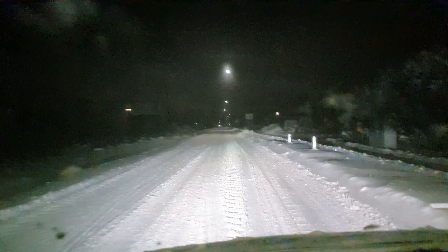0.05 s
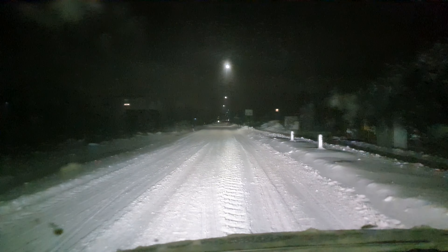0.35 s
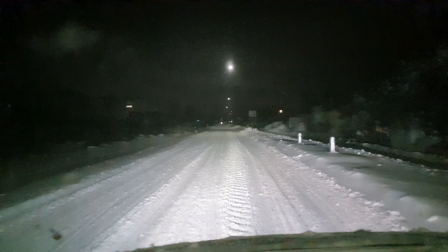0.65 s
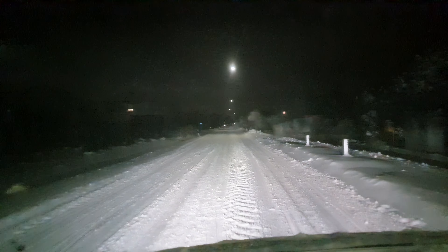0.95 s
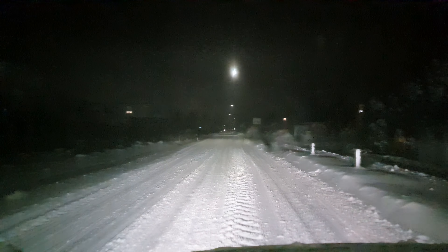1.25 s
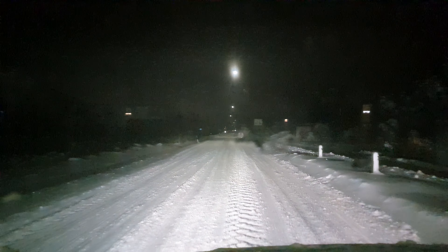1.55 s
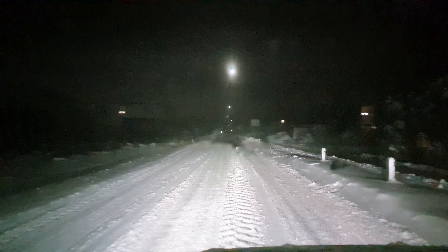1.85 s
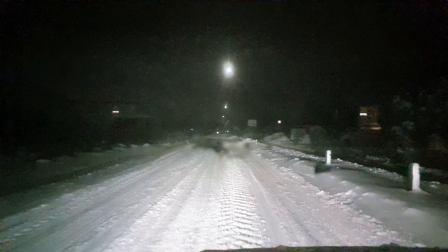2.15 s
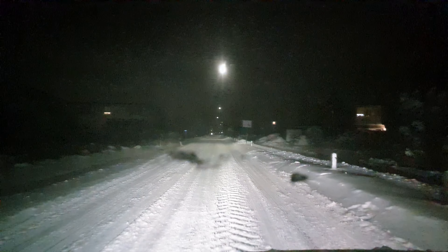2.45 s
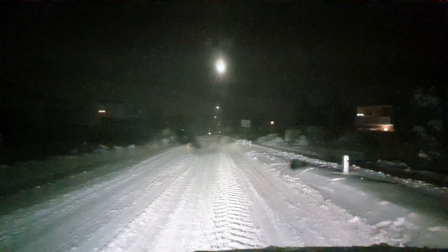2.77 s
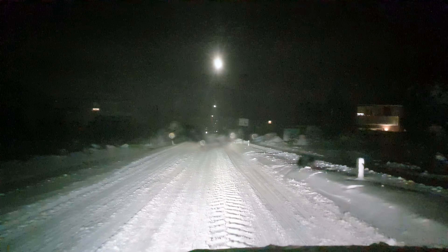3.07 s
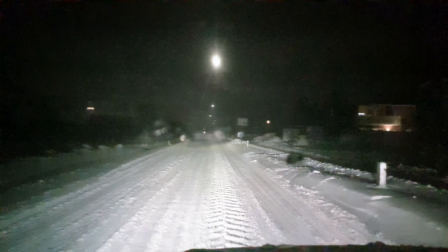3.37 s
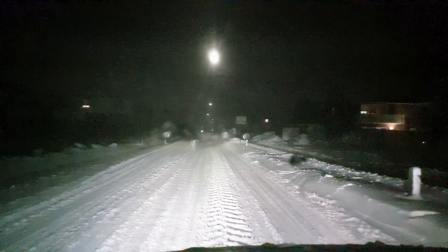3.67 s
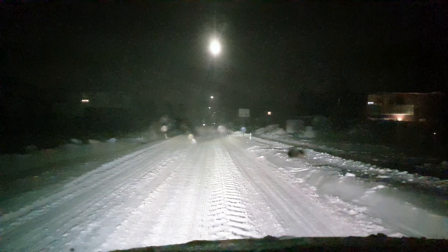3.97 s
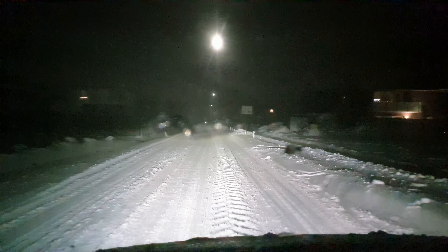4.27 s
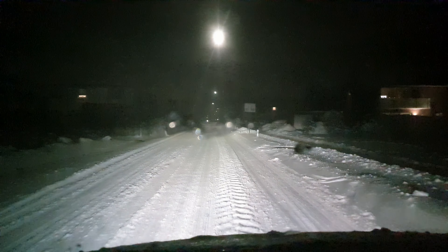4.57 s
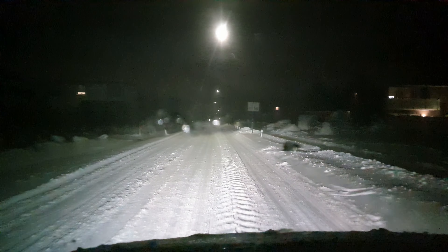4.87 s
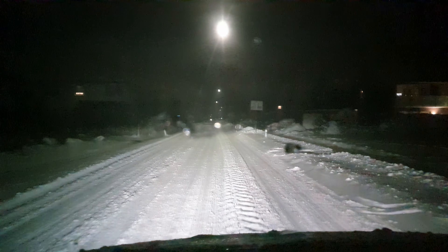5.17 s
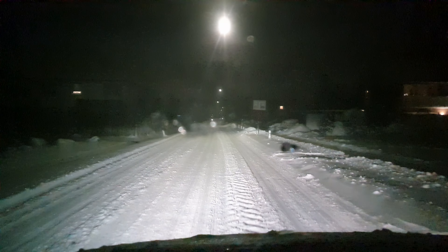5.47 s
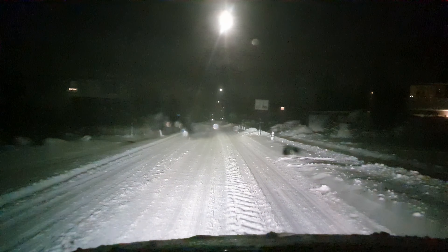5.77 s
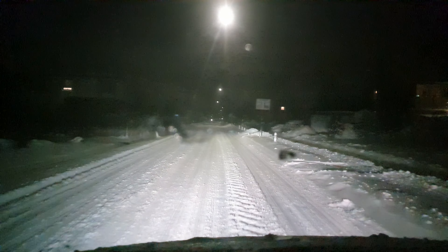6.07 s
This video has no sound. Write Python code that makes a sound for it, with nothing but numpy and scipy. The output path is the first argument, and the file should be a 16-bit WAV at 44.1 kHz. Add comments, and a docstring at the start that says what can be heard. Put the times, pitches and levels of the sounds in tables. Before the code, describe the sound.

A low engine boom and deep tyre rumble fill a car's cabin for about six seconds, heard through a hand-held microphone. The engine note sags slightly near 0.7 seconds, then slowly climbs. Fingers rub on the microphone's case, mostly in the first two seconds, with small taps at 1.2 and 3.8. A sharp plastic trim click comes at 0.4 seconds, and further ticks are scattered throughout, clearest at 3.1, 5.4 and 5.7. From about 1 second a faint gear whine rises in pitch, easing after 5, beside a thin mechanical rush. From 2 seconds the tyres rumble harder over rutted snow, with the biggest bumps around 3.3, where the engine boom thins before returning at 4. Lumps of snow thud softly under the floor near 3.3 and 5.1 seconds. A faint hiss lies beneath everything.

```python
"""A four-cylinder engine booms inside a car that slowly gathers speed on packed snow. The tyres rumble over
ruts, the drive train rushes and sings, and gear teeth whine faintly. Plastic trim ticks as the body shakes, and
the suspension thuds under the floor. It is all heard from a hand-held camera behind the windscreen, whose case
fingers rub and tap."""
import sys
import numpy as np
from scipy.fft import rfft, irfft, next_fast_len
from scipy.io import wavfile
from scipy.ndimage import map_coordinates

SR = 44100
rng = np.random.default_rng(int(sys.argv[2]) if len(sys.argv) > 2 else 0)


def persist_wave(psi):
    """Save psi, clipped to +-1, as 16-bit WAV."""
    counts = np.round(np.clip(psi, -1, 1) * 32767).astype(np.int16)
    wavfile.write(sys.argv[1], SR, np.atleast_2d(counts).T)


N = 269892


def amp(db):
    """Turn decibels into a gain to multiply by."""
    return np.exp(np.asarray(db) * (np.log(10) / 20))


def unit(x):
    """Scale a sound to an average (rms) level of 1."""
    return x / np.sqrt(np.mean(x ** 2) + 1e-20)


def along(points, hz):
    """Read between (frequency, value) points, with octaves evenly spaced."""
    freqs, values = np.transpose(points)
    return np.interp(np.log(hz + 1), np.log(freqs + 1), values)


def curve(points):
    """Join (time, value) points with straight lines, one value per sample."""
    times, values = np.transpose(points)
    return np.interp(np.arange(N) / SR, times, values)


def wobble(rate):
    """A smooth curve through rate random values a second."""
    coarse = np.arange(0, N + 64, 64)
    knots = rng.standard_normal(1024)
    return np.interp(np.arange(N), coarse, map_coordinates(knots, [coarse * rate / SR], mode="mirror"))


def swell(start, length, attack, release):
    """A gain that rises over attack, holds until length has passed, then dies away."""
    t = np.arange(N) / SR - start
    return np.clip(t / attack, 0, 1) * np.exp(-np.maximum(t - length, 0) / release)


def fade(t, t60):
    """A gain that starts at t = 0 and falls 60 dB in t60 seconds."""
    return (t >= 0) * amp(-60 * np.abs(t) / t60)


def filtered(x, response):
    """Multiply each frequency in x by response(hz)."""
    size = x.shape[-1]
    padded = next_fast_len(size + 8192)
    return irfft(rfft(x, padded) * response(np.fft.rfftfreq(padded, 1 / SR)), padded)[..., :size]


def coloured(x, spectrum):
    """Shape x with (frequency, level) points, then scale it to level 1."""
    return unit(filtered(x, lambda hz: amp(along(spectrum, hz))))


def resonance(hz, centre, width, db):
    """The response of something that rings near one pitch."""
    return amp(db) * (1j * hz * width / (centre ** 2 - hz ** 2 + 1j * hz * width)) ** 2


def resonant(x, modes):
    """Let x ring (pitch, width, level) resonances, then scale it to level 1."""
    return unit(filtered(x, lambda hz: sum(resonance(hz, *mode) for mode in modes)))


def add(out, sound, start, db, pan_db):
    """Mix a short sound into out; a positive pan_db moves it left."""
    place = out[:, round(start * SR):][:, :sound.shape[-1]]
    place += amp(db + pan_db * np.array([[.5], [-.5]])) * sound[..., :place.shape[-1]]


# how alike the two microphones hear the cabin (frequency [Hz], likeness [-1 opposite to 1 same])
LIKENESS = [(35, .999), (55, .995), (130, .92), (290, .86), (640, .15), (1000, -.5), (1300, -.65),
            (1700, -.3), (2050, .1), (2500, -.2), (3100, .05), (6800, 0)]

def spread(hz):
    """An angle that grows as left and right become less alike."""
    return np.arccos(np.clip(along(LIKENESS, hz), -1, 1)) / 2


def cabin_noise():
    """White noise at two microphones: alike in the bass, unrelated in the high treble."""
    shares = lambda hz: np.array([np.cos(spread(hz)), np.sin(spread(hz))])
    mid, side = filtered(rng.standard_normal((2, N)), shares)
    return np.array([mid + side, mid - side])


def order_tone(order, speed, angle):
    """A tone with order cycles per shaft turn; standing waves put the left side ahead."""
    apart = spread(order * speed.mean())
    phase = order * angle + rng.uniform(0, 2 * np.pi) + apart * np.array([[1], [-1]])
    return np.sqrt(2) * np.sin(phase.astype(np.float32)) / np.cos(apart)


# the engine sags briefly, then slowly speeds up (time [s], speed [turns/s])
ENGINE_SPEED = [(0.1, 26.02), (0.4, 26.33), (0.7, 25.35), (1.3, 25.77), (2, 26.8), (3.2, 27.92), (4, 28.11),
                (4.8, 29.17), (5.7, 29.7)]

def crank():
    """How fast the engine's crankshaft spins and how far it has turned."""
    speed = curve(ENGINE_SPEED)
    return speed, 2 * np.pi * np.cumsum(speed) / SR


# bumps in the snow (time [s], level change [dB])
SNOW_BUMPS = [(0.474, 3), (2.301, 2), (2.468, 4), (2.72, 1.5), (3.06, 5), (3.253, 7.5), (3.335, 6.5),
              (3.75, 3), (4.48, 2), (4.65, 2.5), (5.158, 3.5), (5.381, 1.5), (5.719, 1), (5.959, 2)]
# brief dips in the bass (time [s], level change [dB])
BASS_DIPS = [(.38, -3.5), (1.31, -5), (1.529, -3.5), (2.41, -9), (2.83, -5.5), (3.15, -1.5), (3.41, -1),
             (3.83, -0.5), (3.99, -1), (4.08, -5), (4.201, -9), (4.809, -1), (4.901, -1), (5.779, -5),
             (5.895, -7.5)]

def throb(length_s=.07):
    """Short swells and dips of the engine's boom and the tyres' rumble, in dB."""
    t = np.arange(N) / SR
    return sum(db * np.exp(-(2 * (t - when) / length_s) ** 2) for when, db in SNOW_BUMPS + BASS_DIPS)


# pitches at which the cabin rings (pitch [Hz], width [Hz], boost [dB])
CABIN_RINGS = [(220, 20, 5), (293, 26, 6), (385, 32, 6), (465, 25, 5), (598, 62, 8), (735, 50, 6)]

def cabin_lift(hz):
    """The decibels a tone gains as it slides through the cabin's resonances."""
    grid = np.arange(1024)
    boost_db = sum(db / (1 + (2 * (grid - centre) / width) ** 2) for centre, width, db in CABIN_RINGS)
    return np.interp(hz, grid, boost_db)


# the boom of the firings (time [s], level [dB])
BOOM_LEVEL = [(0.1, -20), (1, -20.5), (2.2, -20), (2.8, -23.5), (3.2, -29.5), (3.65, -29.5), (4.2, -23.5),
              (4.8, -24.5), (5.6, -21.5)]
# overtones that change with load (order [cycles/turn], cruising level [dB], change [dB per turn/s])
LOAD_TONES = [(4, -34, -2.1), (6, -42, -.8), (10, -53, 1.4), (12, -51.5, -.8), (23, -63, -1.3)]
# weaker tones from unequal cylinders (order [cycles/turn], level [dB])
UNEVEN_TONES = [(5, -51), (6.5, -58), (7.5, -61), (8, -55), (8.5, -58), (9, -62), (9.5, -58), (10.5, -56),
                (11.5, -60), (12.5, -56.5), (13.5, -64), (14, -63), (14.5, -63), (15, -63), (16, -67),
                (17, -70), (18, -66), (20, -70), (21, -71), (22, -69.5), (24, -69), (25, -72), (25.5, -74),
                (26.5, -74), (27, -75), (28.5, -77), (29, -77), (30, -79)]

def engine(boom_offset_db=-0.27, cruise_turns_per_s=27.5):
    """Two firings a turn make the boom; unequal cylinders add weaker tones above it."""
    speed, angle = crank()
    firing = order_tone(2, speed, angle)
    out = amp(curve(BOOM_LEVEL) + boom_offset_db + throb() + 0.31 * wobble(17)) * firing
    for order, db, slope_db in LOAD_TONES:
        level_db = db + slope_db * (speed - cruise_turns_per_s) + 1.2 * wobble(3)
        out += amp(level_db + cabin_lift(order * speed)) * order_tone(order, speed, angle)
    for order, db in UNEVEN_TONES:
        out += amp(db + cabin_lift(order * speed) + 1.6 * wobble(3)) * order_tone(order, speed, angle)
    return out


# the tyres' deep rumble (frequency [Hz], relative level [dB])
RUMBLE_COLOUR = [(15, -33.5), (22, -17), (28, -5), (36, -7.5), (44, 6.5), (54, -11.5), (70, -3), (95, -6),
                 (125, -15), (150, -17), (190, -32), (260, -40.5), (500, -88.5)]
# the tread's higher roar (frequency [Hz], relative level [dB])
ROAR_COLOUR = [(100, -28), (180, -5), (300, -6.5), (380, -8.5), (460, -13.5), (660, -14), (800, -23.5),
               (1000, -27), (1400, -29.5), (2500, -34), (5000, -70)]

def tyres(smooth_snow_db=-27, ruts_extra_db=3.42, roar_db=-43):
    """Ruts and bumps shake the body; the tread roars on the packed snow."""
    ruts = swell(start=2.1, length=4.4, attack=0.17, release=0.17)
    jolts = wobble(11)
    rumble_db = smooth_snow_db + ruts_extra_db * ruts + throb() + 1.1 * jolts
    rumble = amp(rumble_db) * coloured(cabin_noise(), RUMBLE_COLOUR)
    roar = amp(roar_db + wobble(1.8) + 0.48 * jolts) * coloured(cabin_noise(), ROAR_COLOUR)
    return rumble + roar


# the rush of the parts that drive the wheels (frequency [Hz], relative level [dB])
RUSH_COLOUR = [(600, -25.5), (1250, 2), (1700, -5), (2500, -6.5), (2900, -5), (3600, -6.5), (4200, -13.5),
               (5500, -30.5), (9000, -55.5)]
# they take up load (start [s], rise time [s], level before [dB], level after [dB])
DRIVE_LOAD = (2.2, 2.5, -66, -65.5)
# pitches at which they sing (pitch [Hz], width [Hz], relative level [dB])
DRIVE_RINGS = [(1265, 70, -5), (1330, 60, -6), (1590, 65, 0), (1665, 75, 3), (2050, 100, 4.5),
               (2150, 60, -3), (2560, 75, -.5), (3555, 140, -3)]
# how strongly they sing (time [s], level above the rush [dB])
SINGING_LEVEL = [(.7, -1), (1.5, 1), (1.95, 5.5), (2.6, 6), (3.2, 3), (3.65, 4.5), (4.05, 2.5), (4.8, 5),
                 (6, 3.5)]

def drive_train(flutter_db=1.6, chafe_db=3, db_per_turn_per_s=1.34, cruise_turns_per_s=27.5):
    """A rush swells with each firing; rubbing once a turn makes the parts ring, each wavering alone."""
    start, rise, before_db, after_db = DRIVE_LOAD
    load_db = curve([(start, before_db), (start + rise, after_db)])
    speed, angle = crank()
    rush = coloured(cabin_noise(), RUSH_COLOUR) * amp(np.cos(2 * angle))
    chafing = coloured(cabin_noise(), RUSH_COLOUR)
    chafing *= amp(chafe_db * np.cos(angle) + flutter_db * wobble(20))
    singing = sum(amp(.5 * wobble(7)) * filtered(chafing, lambda hz: resonance(hz, *mode))
                  for mode in DRIVE_RINGS)
    level_db = load_db + db_per_turn_per_s * (speed - cruise_turns_per_s)
    return amp(level_db) * (rush + amp(curve(SINGING_LEVEL)) * unit(singing))


# the sound of skin on the camera's case (frequency [Hz], relative level [dB])
CASE_COLOUR = [(500, -3.5), (900, 6.5), (1500, -5), (3000, 4), (4500, 0.5), (8000, -8), (9500, -5),
               (12500, -8), (15500, -15.5)]
# finger strokes (start [s], length [s], level [dB])
FINGER_STROKES = [(0.127, 0.25, -50), (0.384, 0.18, -58), (0.726, 0.26, -56), (0.983, 0.13, -63.5),
                  (1.104, 0.089, -56), (1.223, 0.12, -54), (1.46, 0.31, -65), (1.815, 0.12, -66),
                  (2.179, .19, -65.5), (2.403, 0.14, -60), (3.086, 0.05, -66.5), (3.519, 0.072, -71),
                  (3.747, 0.14, -67), (3.929, 0.18, -65.5), (4.37, 0.062, -67), (4.66, .22, -70),
                  (5.137, 0.1, -74.5), (5.891, 0.22, -70.5)]

def fingers(grip_db=-53.5, ease_db_per_s=7.5, settle_s=1.95, grain_db=0.64, pressure_db=0.63):
    """Skin slips on the case in tiny grains, as the grip settles and with each stroke."""
    t = np.arange(N) / SR
    touch = lambda start, length: swell(start, length, attack=.075, release=.048)
    grip = amp(grip_db - ease_db_per_s * t) * touch(0, settle_s)
    power = grip ** 2 + sum((amp(db) * touch(start, length)) ** 2 for start, length, db in FINGER_STROKES)
    slips = rng.standard_normal((2, N)) * amp(grain_db * wobble(160))
    return np.sqrt(power) * amp(pressure_db * wobble(49)) * coloured(slips, CASE_COLOUR)


# the background hiss (frequency [Hz], relative level [dB])
HISS_COLOUR = [(2000, -9), (5700, -4), (7000, 2.5), (9700, -7), (10300, -8.5), (12800, -12), (13400, -18.5),
               (16000, -19.5)]

def hiss(db=-77):
    """A faint, steady hiss lies under everything."""
    return amp(db) * coloured(rng.standard_normal((2, N)), HISS_COLOUR)


# pitches at which the plastic panel rings (pitch [Hz], width [Hz], relative level [dB])
PANEL_RINGS = [(1020, 200, -8), (1330, 200, -1), (1640, 160, -1), (1940, 260, 2), (2360, 230, 4),
               (3160, 200, -4.5), (3520, 220, -13), (4330, 350, -14), (4850, 300, -19)]
# a tick's bright snap (frequency [Hz], relative level [dB])
SNAP_COLOUR = [(1000, 6), (2500, 7), (4000, 2), (5700, -4.5), (7500, -8.5), (9500, -9), (15500, -17)]
# ticks of the trim (time [s], level [dB], hardness [dB/octave], extra snap [dB], extra knock [dB],
# knock pitch [Hz], left over right [dB])
TRIM_TICKS = [(0.3928, -27, 0, -0.5, 3, 610, 2.5), (1.498, -46, 8, 7, -14, 700, 5.5),
              (3.05, -33.5, 1, -12, -2.5, 720, 11), (3.337, -43, 4, 2, 9.5, 597, 6),
              (3.815, -45.5, -5, -3.5, -10, 748, -8), (4.374, -43, -0.5, -0.5, -2.5, 660, 8.5),
              (4.682, -50.5, 0, 7.5, -9, 755, 6.5), (5.124, -46.5, -4.5, 9, -2, 700, 10),
              (5.3819, -34.5, 2.5, -10.5, -4.5, 720, 8.5), (5.6872, -36.5, 3, 4, 1.5, 550, 6.5),
              (5.9693, -44, -4, -2, -9, 745, 5.5)]

def trim_ticks(ring_db=-24, knock_db=-25.0, snap_db=-6.5, rebound_s=.0055):
    """Plastic trim slips with a snap; the blow and its after-shakes ring the panel and knock its mount."""
    t = np.arange(SR // 4) / SR
    out = np.zeros((2, N))
    noise = lambda: rng.standard_normal((2, len(t)))
    blow = unit(1.0 * (t == 0))
    rebound = amp(-7) * np.roll(blow, round(rebound_s * SR))  # the panel falls back once
    # the snap arrives directly, then scatters round the cabin
    snap_fade = fade(t, t60=0.016) + amp(-20) * fade(t, t60=0.32)
    for start, db, hardness, extra_snap_db, extra_knock_db, knock_hz, pan_db in TRIM_TICKS:
        judder = amp(-5) * unit(noise() * fade(t, t60=.05))
        rattle = amp(-11) * unit(noise() * fade(t, t60=.2))
        force = blow + rebound + judder + rattle
        panel = [(hz, width, level + hardness * np.log2(hz)) for hz, width, level in PANEL_RINGS]
        ring = amp(ring_db) * resonant(force, panel)
        knock = amp(knock_db + extra_knock_db) * resonant(force, [(knock_hz, .35 * knock_hz, 0)])
        snap = amp(snap_db + extra_snap_db) * snap_fade * coloured(noise(), SNAP_COLOUR)
        add(out, ring + knock + snap, start, db, pan_db)
    return out


# the whine comes and goes (start [s], length [s], level [dB], rise time [s], fade time [s])
GEAR_SWELL = (1.1, 4.1, -45.3, 1.0, 1.0)

def gears(teeth=13, caught_up_s=2.7, catch_up_per_s=.046, jolts_per_s=14):
    """Meshing teeth make a soft tone that climbs as the gearbox catches up with the engine."""
    start, length, db, attack, release = GEAR_SWELL
    engine_speed, _ = crank()
    slip = catch_up_per_s * np.maximum(caught_up_s - np.arange(N) / SR, 0)
    # the road shakes the gears, so pitch and level waver
    shaft_speed = engine_speed * (1 - slip + .004 * wobble(jolts_per_s))
    level = amp(db + 1.7 * wobble(jolts_per_s)) * swell(start, length, attack, release)
    return level * order_tone(teeth, shaft_speed, 2 * np.pi * np.cumsum(shaft_speed) / SR)


# the case's dull resonances (pitch [Hz], width [Hz], relative level [dB])
CASE_RINGS = [(780, 380, 0), (1420, 450, -9), (2800, 800, -13)]
# taps on the case (time [s], level [dB], extra knock [dB], left over right [dB])
FINGER_TAPS = [(1.1656, -40.5, 5.5, -6.5), (3.7586, -44, -2.5, 5)]

def taps(knock_db=-21.5, t60=.007, again_s=.0018, again_db=-3):
    """A fingertip meets the case twice in a flash: a dry click over a dead, hollow knock."""
    t = np.arange(SR // 4) / SR
    out = np.zeros((2, N))
    contacts = fade(t, t60) + amp(again_db) * fade(t - again_s, t60)
    knock = resonant(1.0 * (t == 0), CASE_RINGS)
    for start, db, extra_knock_db, pan_db in FINGER_TAPS:
        click = contacts * coloured(rng.standard_normal((2, len(t))), CASE_COLOUR)
        add(out, click + amp(knock_db + extra_knock_db) * knock, start, db, pan_db)
    return out


# thuds of the suspension (time [s], level [dB], pitch [Hz])
SUSPENSION_THUDS = [(3.255, -54.5, 452), (5.124, -51, 553)]

def suspension_thuds(width_share=0.28, t60=0.11, pan_db=4):
    """The suspension thuds dully beneath the car."""
    t = np.arange(SR // 4) / SR
    out = np.zeros((2, N))
    for start, db, hz in SUSPENSION_THUDS:
        force = unit(1.0 * (t == 0)) + unit(rng.standard_normal((2, len(t))) * fade(t, t60))
        add(out, resonant(force, [(hz, width_share * hz, 0)]), start, db, pan_db)
    return out


# the balance of the car's steady sound (frequency [Hz], left over right [dB])
CAR_BALANCE = [(60, 0.15), (200, .6), (380, -.6), (700, 3.2), (1300, .5), (2400, 1.2), (4400, .5)]

def scene():
    """The car's steady sound leans a little to the left; small near sounds lie on top."""
    car = engine() + gears() + tyres() + drive_train()
    car = filtered(car, lambda hz: amp(along(CAR_BALANCE, hz) * np.array([[.5], [-.5]])))
    return car + fingers() + hiss() + taps() + trim_ticks() + suspension_thuds()


# each microphone opening has its own treble resonance (frequency [Hz], boost [dB])
LEFT_OPENING = [(4500, -4), (5800, 1), (7000, 5), (8300, 2.5), (9500, 0), (12000, 1)]
RIGHT_OPENING = [(3300, -4.5), (4300, -4), (5500, -4.5), (6500, -7), (7800, -6), (8800, 8), (10000, 4.5),
                 (12000, 1.5)]

def record(dry, start_s=.069, full_colour_hz=2500, top_hz=15830):
    """The sound starts after a moment; the openings colour the treble, and the very top is cut off."""
    t = np.arange(N) / SR
    sounding = np.clip(np.minimum(t - start_s, t[-1] - t) / .002, 0, 1)

    def microphones(hz):
        boost_db = np.array([along(LEFT_OPENING, hz), along(RIGHT_OPENING, hz)])
        return amp(boost_db * np.minimum(hz / full_colour_hz, 1)) * (hz < top_hz)

    return filtered(dry * sounding, microphones)


dry = scene()
out = record(dry)
persist_wave(out)
```